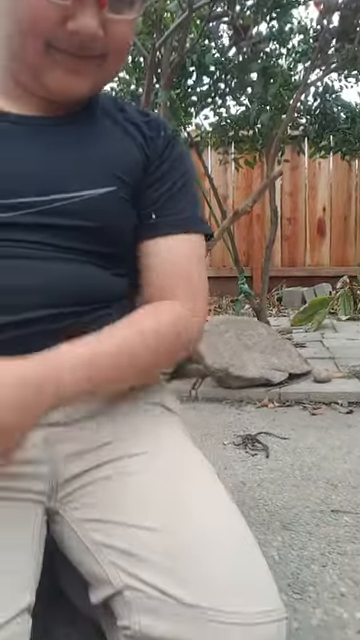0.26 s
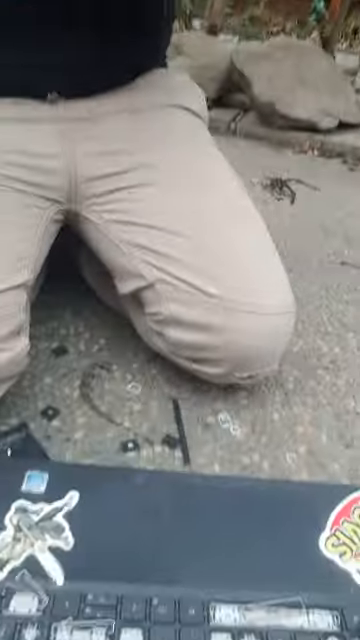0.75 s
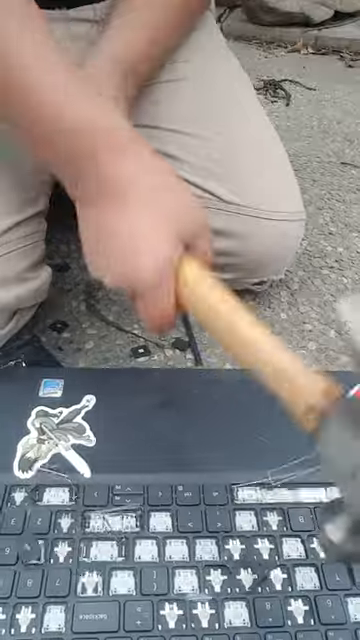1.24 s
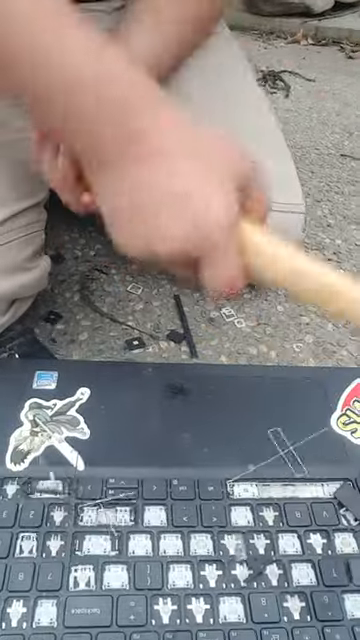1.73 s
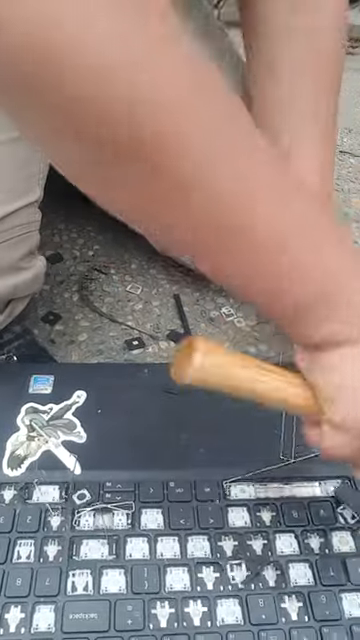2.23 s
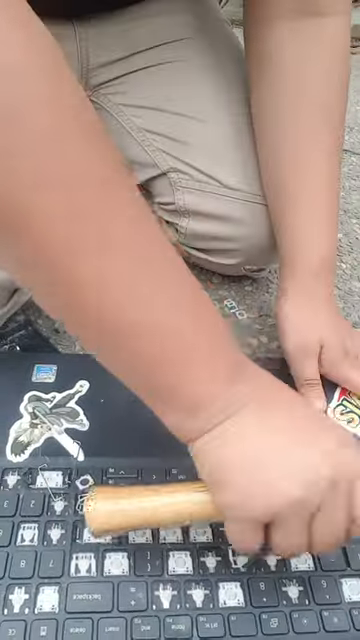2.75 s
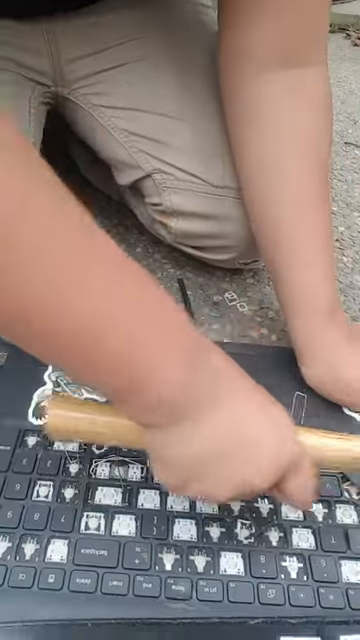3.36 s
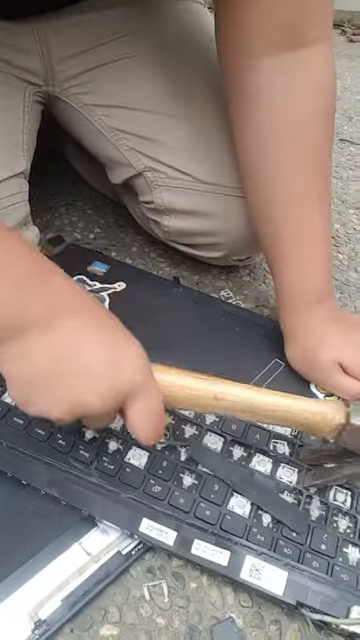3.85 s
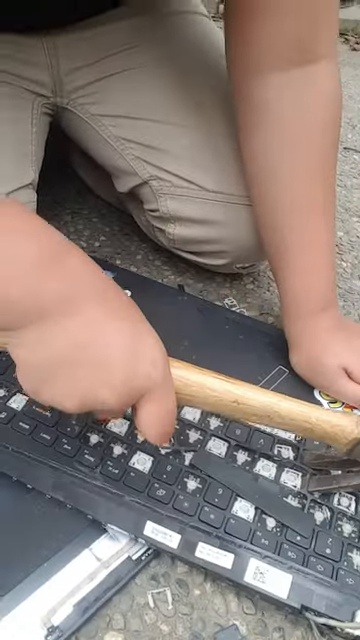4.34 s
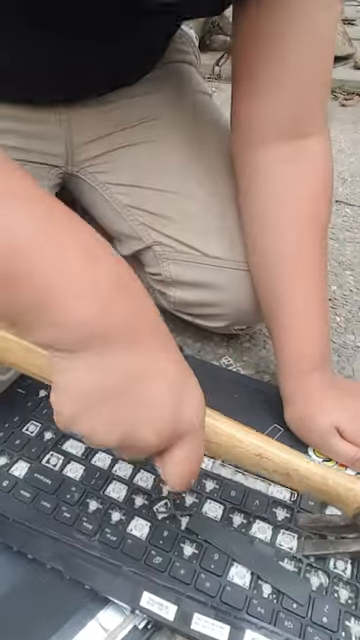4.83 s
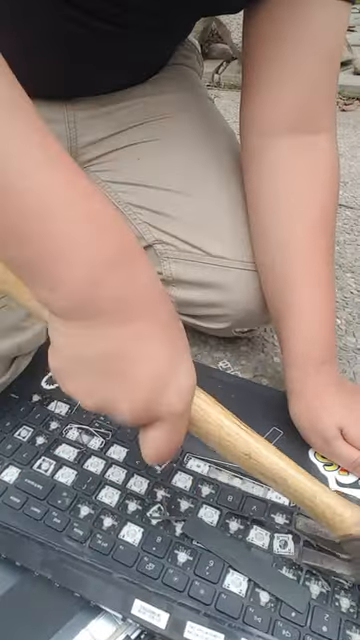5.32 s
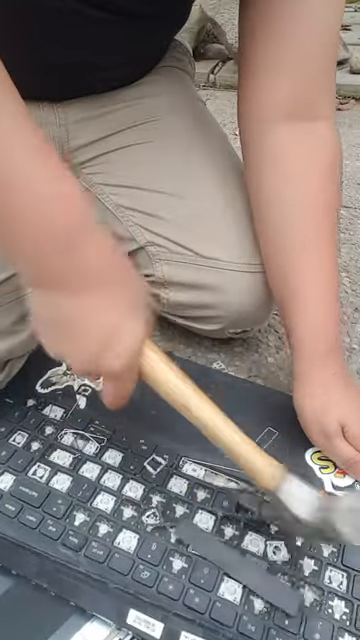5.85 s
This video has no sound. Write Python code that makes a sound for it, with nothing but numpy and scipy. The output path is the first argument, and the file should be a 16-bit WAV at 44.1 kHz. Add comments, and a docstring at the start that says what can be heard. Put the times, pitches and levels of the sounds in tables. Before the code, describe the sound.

Faint knocks, then two violent plastic smashes with scattering key rattle, followed by uneven claw scraping, clinks and sharp snaps over low traffic rumble.

```python
"""Far traffic rumbles over a yard throughout, as slowly swelling noise, and cloth rustles faintly on plastic.
After a few light knocks a hammer comes down twice on a plastic laptop lying on paving: bursts of fractures
ring case and keys, the slab thumps and loose keys rattle. Then its claw drags over the keys, prying and
snapping them: clumped grit excites the plastic, the steel clinks, and later slides sing faintly.
A phone with two ports listens close by; the first blow overloads it, its gain ducks and slowly recovers."""
import sys
import numpy as np
from scipy import signal
from scipy.fft import rfft, irfft
from scipy.io import wavfile
from scipy.ndimage import uniform_filter1d, minimum_filter1d

SR = 44100
rng = np.random.default_rng(int(sys.argv[2]) if len(sys.argv) > 2 else 0)


def attenuation_scalar(level_db):
    """Turn a level in dB into a linear amplitude multiplier (20 dB per decade)."""
    decades = np.asarray(level_db, float) / 20
    return 10 ** decades


def to_wav(s):
    """Save 16-bit WAV."""
    ch = np.atleast_2d(s).T  # columns
    pcm = np.round(np.clip(ch, -1, 1) * 32767)  # PCM
    wavfile.write(sys.argv[1], SR, pcm.astype(np.int16))


N = 268128  # samples


def evened(x):
    """Power normalisation: scales to rms 1."""
    return x / np.sqrt(np.mean(x ** 2) + 1e-20)


def peaked(x, size):
    """Short-time power normalisation: the loudest stretch of size samples gets rms 1."""
    power = np.atleast_2d(x ** 2).mean(0)
    return x / np.sqrt(uniform_filter1d(power, size).max())


def read(points, hz):
    """Logarithmic frequency scale: interpolates a spectrum table along it."""
    f, value = np.transpose(points)
    return np.interp(np.log(hz + 1), np.log(f + 1), value)


def add(mix, s, sound):
    """Superposition: adds a sound to the mix from time s in seconds."""
    part = mix[:, round(s * SR):][:, :sound.shape[-1]]
    part += sound[..., :part.shape[1]]


def colour(x, gain):
    """Linear filtering: multiplies the spectrum by a gain for every frequency bin."""
    return irfft(rfft(x) * gain, x.shape[-1])


def lumps(size, width, depth_db):
    """Amplitude modulation by slow noise: a gain in clumps about width samples long."""
    slow = uniform_filter1d(uniform_filter1d(rng.standard_normal(size), width), width)
    return attenuation_scalar(depth_db * evened(slow))


def grit(size, lumpy_db, own=1.0):
    """Asperity contact: dense tiny impulses of very uneven size, partly different at each port."""
    shared, *apart = rng.standard_normal((3, size))
    unevenness = np.minimum(rng.exponential(1, size), 5)
    return (shared + own * np.array(apart)) * attenuation_scalar(lumpy_db * unevenness)


def ring(modes, spread_db, detune, spot_hz=None):
    """Modal superposition: decaying sines, varied in level and pitch for one spot, with total energy 1."""
    hz, db, t60 = np.transpose(modes)[:, :, None]
    level_luck, pitch_luck = rng.standard_normal((2, len(modes), 1))
    t = np.arange(4000) / SR
    if spot_hz:  # modes that move most at this spot take most of the blow
        octaves = np.log2(hz / spot_hz)
        db = db + 12 * np.exp(-(octaves / .25) ** 2)
    decay = attenuation_scalar(db + spread_db * level_luck - 60 * t / t60)
    tone = (decay * np.sin(2 * np.pi * hz * (1 + detune * pitch_luck) * t)).sum(0)
    # keeps each set of modes free of bass below its lowest mode
    highpass = signal.butter(5, 0.85 * hz.min(), "high", fs=SR, output="sos")
    tone = signal.sosfilt(highpass, tone)
    return tone / np.linalg.norm(tone)


# Spectrum of the far traffic and air. Each row: frequency in Hz, relative level in dB per Hz.
YARD_SPECTRUM = [(15, -48), (25, -33.5), (64, -6.5), (127, -2), (162, -5.5), (224, -7.5), (440, -16),
                 (562, -15), (777, -19), (914, -16), (4890, -41), (16100, -63)]
# Likeness of the two ports in the yard noise. Each row: frequency in Hz, left-right correlation (no unit).
YARD_LIKENESS = [(60, 0.87), (240, 0.91), (950, 0.17), (3770, -0.07), (15000, 0.02)]
# Changing level of the lowest rumble. Each row: time in seconds, gain in dB.
RUMBLE = [(0, -9), (.3, 1.5), (2.3, 3.5), (3.5, 1.5), (5, -0.5), (5.8, -1.5), (6.08, 6)]
YARD_DB, RUMBLE_HZ = -45.5, 280  # overall rms; the rumble gain in dB is halved at this frequency


def yard():
    """Diffuse noise field: random spectra with soft patches and a slow swell, partly alike at both ports."""
    frames, hz = N // 256 + 5, np.fft.rfftfreq(1024, 1 / SR)
    a, b, c, d, patches = rng.standard_normal((frames, 513, 5)).T
    patches = evened(uniform_filter1d(uniform_filter1d(patches, 10, 0), 14, 1))
    t = np.arange(frames) * 256 / SR
    swell = evened(sum(np.sin(2 * np.pi * (f * t + rng.random())) / np.sqrt(f)
                       for f in np.geomspace(.3, 4, 20)))
    same = np.clip(read(YARD_LIKENESS, hz), -1, 1)[:, None]
    left = a + 1j * b
    right = same * left + np.sqrt(1 - same ** 2) * (c + 1j * d)
    spectra = np.array([left, right])
    spectra *= attenuation_scalar(read(YARD_SPECTRUM, hz)[:, None] + 1.2 * patches + .8 * swell)
    rumble_db = np.interp(t, *np.transpose(RUMBLE))
    spectra *= attenuation_scalar(rumble_db / (1 + (hz[:, None] / RUMBLE_HZ) ** 4))
    noise = signal.istft(spectra, nperseg=1024, noverlap=768)[1][:, :N]
    return attenuation_scalar(YARD_DB) * evened(noise)


# Faint rustle of hands and cloth against the case. Each row: time in seconds, case drive in dB,
# brightness in dB.
RUSTLE = [(0.0, -53.5, 2.5), (0.2, -55, -12), (0.434, -56, -4), (0.743, -55, -8), (1.3, -52, 2),
          (1.8, -61.5, 7), (2.4, -53.5, -11), (4.064, -61, -9), (4.8, -54.5, -3.5), (4.95, -85, 0),
          (5.14, -62, -10), (5.5, -58, -2), (6.08, -58, -16)]
RUSTLE_PANEL_DB, RUSTLE_GRIT_DB = 1, -3  # above the case at brightness 0
# Strokes of the claw over the keys, one list a stroke. Each row: time in seconds, case drive in dB,
# panel above it in dB, grit above it in dB.
STROKES = [
    [(1.97, -47.5, 18, -3), (1.984, -34, 0, -9), (2.051, -26, -5, -5), (2.11, -31, 2, -8),
     (2.157, -67, 11, 12), (2.26, -56.5, 6.5, -7.5), (2.32, -68, 3.5, 1)],
    [(2.66, -49, -7, 4), (2.724, -37, -3.5, -10), (2.77, -62.5, -5, -7), (2.89, -43.5, -2.5, -17),
     (2.93, -54.5, 2, -7), (3.012, -52.5, -2, -4), (3.08, -40, 0, -11.5), (3.135, -40.5, 1, -0.5),
     (3.192, -26.5, 1.5, -6), (3.25, -32, -1.5, -9.5), (3.31, -47, 2, -9.5), (3.351, -30.5, -5.5, -14.5),
     (3.426, -43, -5, -13), (3.53, -40, 9, -1.5), (3.576, -37.5, 5, -1.5), (3.666, -64.5, 5, 2.5),
     (3.8, -62, 4.5, -5.5)],
    [(5.533, -41, 6.5, 8), (5.565, -29, 0, -9), (5.58, -26.5, 2.5, -3), (5.614, -19, -4, 0),
     (5.653, -25, -1, -4.5), (5.675, -29.5, -5.5, -9.5), (5.7, -49, 7.5, 3.5), (5.775, -59, 9, 8),
     (5.856, -49.5, 8.5, 0), (6.079, -52.5, -7.5, -10)],
]
# Loose keys rattling after a jolt. Each row: start in seconds, length in seconds, case drive in dB,
# loss after a tenth of a second in dB, panel above the case in dB.
RATTLES = [(0.953, 0.208, -5.5, 19.5, 0.5), (1.413, 0.16, -13.5, 15.5, 0.5), (2.562, 0.062, -28, 22.5, 2.5),
           (4.459, 0.039, -52.5, 16, 15), (4.626, 0.13, -37, 12.5, 2)]
RATTLE_RISE_S, RATTLE_CURVE = 0.018, .7  # the exponent below 1 makes the loss fastest at first
SETTLE_DB_PER_S, RATTLE_GRIT_DB = 600, -7  # extra loss past the length; grit relative to the panel


def rubbing():
    """Power addition: rustle, strokes and rattles sum into the drives of case, panel and grit."""
    t = np.arange(0, N, 32) / SR
    s, db, bright_db = np.transpose(RUSTLE)
    db, bright_db = np.interp(t, s, db), np.interp(t, s, bright_db)
    power = attenuation_scalar([db, db + RUSTLE_PANEL_DB + bright_db, db + RUSTLE_GRIT_DB + bright_db]) ** 2
    for stroke in STROKES:
        s, db, panel_db, grit_db = np.transpose(stroke)
        drives_db = (db, db + panel_db, db + grit_db)
        power += attenuation_scalar([np.interp(t, s, v, -120, -120) for v in drives_db]) ** 2
    for start, length, db, fade_db, panel_db in RATTLES:
        age = (t - start).clip(0)
        fading_db = db - fade_db * (10 * age) ** RATTLE_CURVE
        fading_db -= SETTLE_DB_PER_S * (age - length).clip(0)
        shares = attenuation_scalar(np.array([[0], [panel_db], [panel_db + RATTLE_GRIT_DB]]))
        power += (shares * attenuation_scalar(fading_db) * np.minimum(age / RATTLE_RISE_S, 1)) ** 2
    return [np.interp(np.arange(N) / SR, t, gain) for gain in np.sqrt(power)]


# Modes of the plastic case, which the hits ring too. Each row: frequency in Hz, relative level in dB,
# decay by 60 dB in seconds.
CASE = [(580, -13, 0.014), (728, -5, 0.034), (799, -1, 0.036), (868.5, 0, 0.021), (1042.5, -1.5, 0.041),
        (1194, -3.5, 0.022), (1300, -8, 0.028), (1349, 8.5, 0.0057)]
# Modes of the key panel, which the hits ring too. Each row: frequency in Hz, relative level in dB,
# decay by 60 dB in seconds.
PANEL = [(1707, -13, 0.023), (2055, -8.5, 0.01), (2436, 5, 0.0038), (2914, -6, 0.0062),
         (3352, -3.5, 0.0032), (3740, -9, 0.0019), (4900, -9, 0.0012)]
# Spectrum of bare cracks and grit, in the hits too. Each row: frequency in Hz, relative level in dB per Hz.
CRACK = [(2530, -29.5), (4300, -4), (5420, -5), (8120, 0), (10000, -10), (12000, -10.5), (15100, -7.5),
         (16100, -22.5)]


def drag():
    """Friction excitation: grit in clumps drives ever-changing spots of the case and panel."""
    case_gain, panel_gain, grit_gain = rubbing()
    contacts = evened(grit(N, 2.5, own=1.2) * lumps(N, width=180, depth_db=3.8))
    jumps = rng.random(N) < 200 / SR  # some 200 jumps of the contact a second
    spot = (np.cumsum(jumps) * 5) % 8
    out = evened(colour(contacts, attenuation_scalar(read(CRACK, np.fft.rfftfreq(N, 1 / SR))))) * grit_gain
    alike = evened(contacts + contacts.mean(0))  # low modes reach both ports more alike
    for modes, pushed in ((CASE, alike * case_gain), (PANEL, contacts * panel_gain)):
        for k in range(8):
            out += signal.oaconvolve(pushed * (spot == k), ring(modes, 3., .05)[None], axes=1)[:, :N]
    return out


def slide(length, hz, db, second_db):
    """Friction-driven resonance: grit rings a sinking tone and, weaker, one near twice its pitch."""
    size = round(length * SR)
    push = grit(size, 0.85) * lumps(size, width=300, depth_db=-2.0)
    r = np.exp(-np.pi * 320 / SR)  # two like poles, each 320 Hz wide
    turns = np.cumsum(hz * (1 - .06 * np.arange(size) / size)) / SR  # sinks by 6 % as the slide slows

    def partial(ratio):
        """Heterodyning: shifts the push down, smooths it and shifts it back to the moving pitch."""
        turn = np.exp(2j * np.pi * ratio * turns)
        return evened((turn * signal.lfilter([1], [1, -2 * r, r * r], push / turn)).real)

    both = partial(1) + attenuation_scalar(second_db) * partial(1.9)
    return attenuation_scalar(db) * both * signal.windows.tukey(size, .4)


# The claw slides under load and sings faintly. Each row: start in seconds, end in seconds,
# starting pitch in Hz, level of the first partial in dB, second partial relative to it in dB.
SLIDES = [(4.65, 4.93, 3200, -63, -20), (5.3, 5.54, 3100, -61, -20), (5.82, 6.14, 2660, -49, -10)]


def slides(near):
    """Sustained friction: adds every singing slide of the claw."""
    for s, end, *how in SLIDES:
        add(near, s, slide(end - s, *how))


# Modes of the steel head. Each row: frequency in Hz, relative level in dB, decay by 60 dB in seconds.
STEEL = [(2380, 0, .05), (3720, 0, .07), (4800, -8, .08), (6300, -7, .045), (7900, -6, .05),
         (10980, -12, .05)]
# Steel knocking a hard edge. Each row: time in seconds, level in dB, pitch favoured by the spot struck in Hz.
CLINKS = [(1.978, -13, 2380), (1.995, -25, 2400), (2.010, -8.5, 3700), (2.022, -18, 3700),
          (2.038, -17.5, 6300), (2.058, -27.5, 6300), (2.094, -16, 3700), (2.178, -42.5, 4820),
          (2.222, -39, 4950), (3.151, -26.5, 6300), (3.192, -31, 6300)]


def clinks(near):
    """Lightly damped modes: the steel head rings on after each knock."""
    for s, db, spot_hz in CLINKS:
        add(near, s, attenuation_scalar(db) * peaked(ring(STEEL, 2., .006, spot_hz), size=100))


# Modes of the paving. Each row: frequency in Hz, relative level in dB, decay by 60 dB in seconds.
SLAB = [(95, -11, .1), (132, -5, 0.12), (190, -1, 0.08), (302, 7, 0.03), (402, -1, .02)]
# Blows and hard levering that thump the paving. Each row: time in seconds, level in dB.
THUMPS = [(0.952, -10), (1.399, -12), (2.57, -31), (3.178, -27), (4.458, -30.5), (5.579, -29.5)]


def thumps(near):
    """Structure-borne sound: low modes of the paving shake each port in its own way."""
    for s, db in THUMPS:
        shaken = np.array([ring(SLAB, 1., .1) for port in "LR"])
        add(near, s, attenuation_scalar(db) * peaked(shaken, size=400))


SNAP_T60, KNOCK_T60 = .03, 0.052  # s: the more a hit shakes the case, the longer it rattles


def hit(panel_db, case_db, crack_db, spot_hz):
    """Impulsive excitation: a sharp break and dying fractures ring the case, the key panel and the air."""
    t = np.arange(8192) / SR
    case_share = 1 / (1 + attenuation_scalar(-case_db))
    t60 = SNAP_T60 + (KNOCK_T60 - SNAP_T60) * case_share
    burst = grit(len(t), 2.) * lumps(len(t), width=60, depth_db=3.) * attenuation_scalar(-60 * t / t60)
    burst[:, 4:7] += 9 * rng.choice([-1, 1]) * np.hanning(5)[1:4]  # the first break
    # low modes reach both ports alike
    case = signal.fftconvolve(burst.mean(0), ring(CASE, 2., .03, spot_hz))[:len(t)]
    panel = signal.fftconvolve(burst, ring(PANEL, 2., .03, spot_hz)[None], axes=1)[:, :len(t)]
    crack_gain = attenuation_scalar(read(CRACK, np.fft.rfftfreq(len(t), 1 / SR)))
    crack = colour(burst * attenuation_scalar(-30 * t / t60), crack_gain)  # bare cracks die sooner
    sound = peaked(panel, size=60)
    sound = sound + attenuation_scalar(case_db) * peaked(case, size=110)
    sound = sound + attenuation_scalar(crack_db) * peaked(crack, size=40)
    return attenuation_scalar(panel_db) * sound[:, :6000]


# Knocks, blows and snaps. Each row: time in seconds, panel level in dB, case relative to it in dB,
# crack relative to it in dB, pitch favoured by the spot struck in Hz.
HITS = [(0.0165, -50, -28, 12, 4530), (0.0696, -45.5, -3, 5.5, 1020), (0.1119, -49, -8, 7, 574),
        (0.1361, -44.5, -16, -0.5, 1450), (0.9516, 10.5, -10.5, -10.5, 1890),
        (1.003, -3, -2.5, -25.5, 1400), (1.023, -7, 2, -6.5, 1050), (1.035, -17, 7.5, -33, 1300),
        (1.047, -15, -1, -24, 1630), (1.06, -18.5, -8.5, -7.5, 1060), (1.077, -23, 0, -16, 1300),
        (1.205, -35, 1.5, 5.5, 1390), (1.2504, -24, -15, -0.5, 1980), (1.3215, -37.5, -6, 3, 3770),
        (1.4032, 4.5, -4, -1, 703), (1.434, -14, 4.5, -43, 1074), (1.467, -12.5, -5.5, -7.5, 726),
        (1.5004, -31, -13, -14, 2600), (1.513, -16.5, -2, -16, 1210), (1.5549, -30, -6, -18, 710),
        (1.6071, -33, -7, 7, 2140), (1.626, -27, -11.5, -2, 1776), (1.676, -39.5, -4, 3.5, 870),
        (1.713, -42, -1, 6, 808), (1.971, -23, -14, -12, 2360), (1.9768, -3, -13, -7, 2510),
        (1.995, -17, -2, -6, 2440), (2.0098, -2, -10.5, -14, 3400), (2.023, -16.5, 1, -14.5, 2030),
        (2.0387, -8, -7.5, -12, 2250), (2.049, -7.5, -8, -23.5, 785), (2.06, -23.5, -1.5, -8, 2069),
        (2.073, -28.5, -7.5, -15, 1080), (2.095, -4.5, -11, -29, 3600), (2.119, -28, -1, -11, 846),
        (2.179, -47.5, 9.5, 7.5, 850), (2.2229, -44, 12.5, 14.5, 903), (2.242, -34, -1.5, -20.5, 830),
        (2.258, -37.5, 12, -0.5, 744), (2.5711, -5, -1, -5.5, 1350), (2.67, -30.5, -10, 0, 2500),
        (2.675, -20.5, 0.5, -11, 1320), (2.7113, -37, 4, -9.5, 1250), (2.851, -35, -26, -2, 873),
        (2.8729, -44, -17, -2.5, 1260), (2.9871, -34, -4.5, -20, 2520), (3.116, -46, 7, 5, 724),
        (3.1394, -29.5, 7, 1.5, 774), (3.151, -19.5, -18.5, 3, 860), (3.1783, -19, 5, -10.5, 1090),
        (3.202, -24.5, 6.5, -10, 1300), (3.2922, -31.5, -9, 9, 2550), (3.364, -30, -15.5, 5, 2870),
        (3.3812, -14, -37, -9.5, 2670), (3.4452, -37, -8.5, 6, 860), (3.5643, -12, -16, -5.5, 1800),
        (4.3535, -39.5, -26, -15.5, 1960), (4.458, -9, -13, 1.5, 3570), (4.583, -46.5, -27, 8.5, 2110),
        (4.636, -27, -4, 6, 670), (4.7357, -28, -16, -6.5, 1930), (4.772, -36.5, -19, 0.5, 2220),
        (4.9513, -29.5, -17.5, 2, 3750), (4.997, -60, -15, 11, 4000), (5.0647, -24, -9, 6.5, 1863),
        (5.4076, -39.5, -4.5, -6, 710), (5.5363, -19.5, -1.5, -2, 720), (5.5702, -12, -5, 3, 1620),
        (5.579, -21, 11.5, 4.5, 730), (5.6, -24, 2.5, -3, 706), (5.618, -19, 9.5, 3, 750),
        (5.631, -11.5, -9, -1, 2100), (5.655, -16.5, 4, 3, 1080), (5.7137, -35, -1.5, 1, 855),
        (5.732, -30.5, -5, -4, 1080), (5.76, -33.5, -7, -0.5, 800), (5.7882, -36, -6, -15, 1910),
        (5.8299, -55, 7, 20.5, 2200), (5.8605, -44.5, 2, 5, 3500), (5.907, -41, -25, 0.5, 3450)]


def hits(near):
    """Impact sequence: adds every knock, blow and snap."""
    for s, *how in HITS:
        add(near, s, hit(*how))


# Level difference of the ports for near sounds. Each row: frequency in Hz, left minus right in dB.
PORTS = [(60, -2.5), (240, -1.0), (950, 2.0), (3770, 0.5), (15000, 0.5)]
LEFT_LAG = 7  # samples


def ports(x):
    """Path difference and reflection: the right port is nearer; paving and fence echo to each port apart."""
    t, slots = np.arange(8000) / SR, np.arange(60, 7980, 20)
    times = slots + rng.integers(0, 20, (2, len(slots)))
    signs = rng.choice([-1., 1.], (2, len(slots)))
    echo = np.zeros((2, len(t)))
    np.put_along_axis(echo, times, signs, 1)
    echo *= attenuation_scalar(-60 * t / .27)  # falls at 60 dB in 0.27 s
    path = attenuation_scalar(-18) * echo / np.linalg.norm(echo[0])
    path[0, LEFT_LAG] += 1
    path[1, 0] += 1
    tilt_db = read(PORTS, np.fft.rfftfreq(N, 1 / SR)) * np.array([[.5], [-.5]])
    return colour(signal.oaconvolve(x, path, axes=1)[:, :N], attenuation_scalar(tilt_db))


def scene():
    """Superposition of fields: everything near the phone, through its ports, over the yard."""
    near = np.zeros((2, N))
    hits(near)
    thumps(near)
    clinks(near)
    slides(near)
    return ports(near + drag()) + yard()


def roll_off(x):
    """The treble ends steeply here."""
    return signal.sosfilt(signal.butter(12, 16250, fs=SR, output="sos"), x)


def record(dry):
    """Dynamic compression: gain drops after an overload, holds, then recovers; what is still too loud clips."""
    power_db = 10 * np.log10(abs(uniform_filter1d((dry ** 2).mean(0), 300)) + 1e-12)
    # highest level of the past 0.45 s, known 300 samples late
    hold = round(.45 * SR) // 2
    held_db = np.roll(-minimum_filter1d(-power_db, size=2 * hold + 1), hold + 300)
    held_db[:hold + 300] = -99
    fall = np.arange(N) * 20. / SR  # the held level sinks by 20 dB a second at most
    falling_db = np.maximum.accumulate(held_db + fall) - fall
    over_db = np.maximum(falling_db + 11.0, 0)  # above a threshold of -11 dB
    lag = np.exp(-1 / (0.039 * SR))  # the control follows with a time constant of 39 ms
    smooth_over_db = signal.lfilter([1 - lag], [1, -lag], over_db)
    clipped = np.clip(dry / attenuation_scalar(1.034 * smooth_over_db), -.95, .95)
    lowpass = signal.firwin(255, 16300, fs=SR)[None]
    limited = signal.oaconvolve(clipped, lowpass, "same", axes=1)
    return roll_off(limited)


dry = scene()
out = record(dry)
to_wav(out)
```